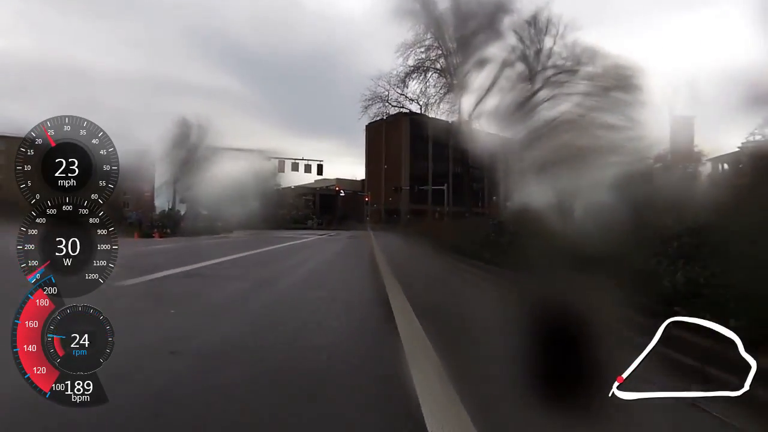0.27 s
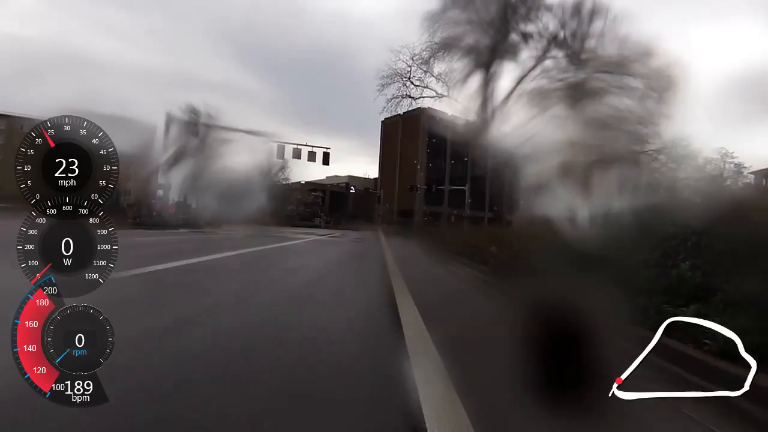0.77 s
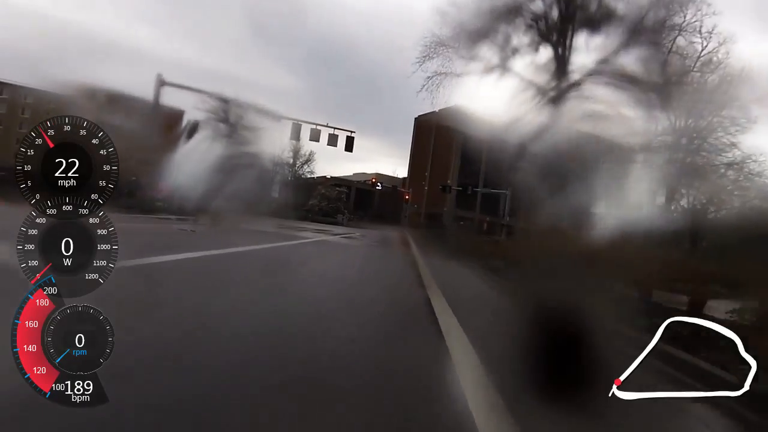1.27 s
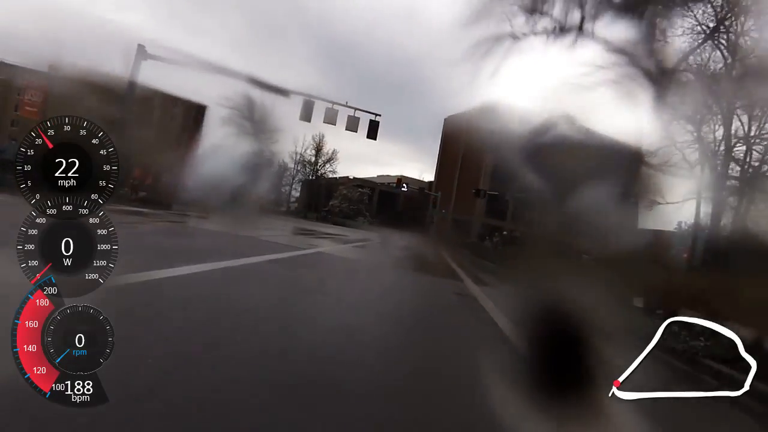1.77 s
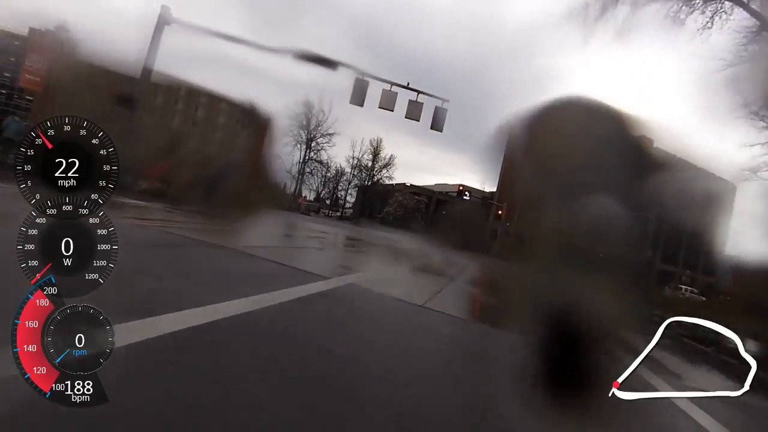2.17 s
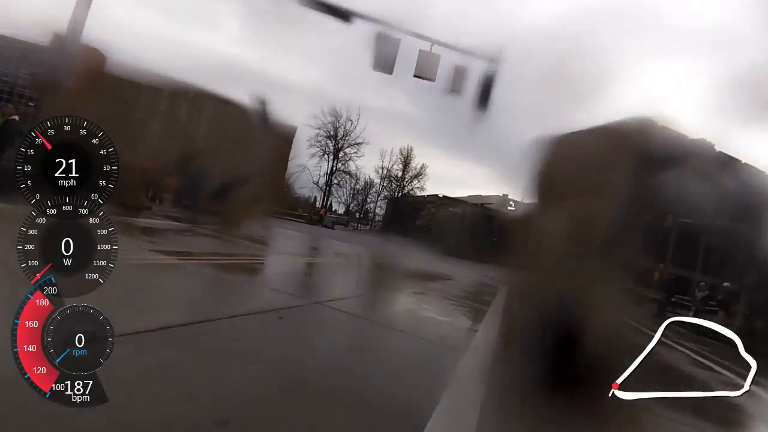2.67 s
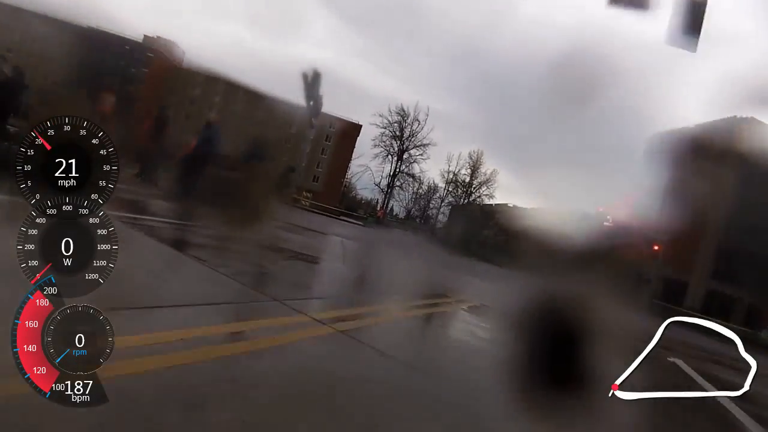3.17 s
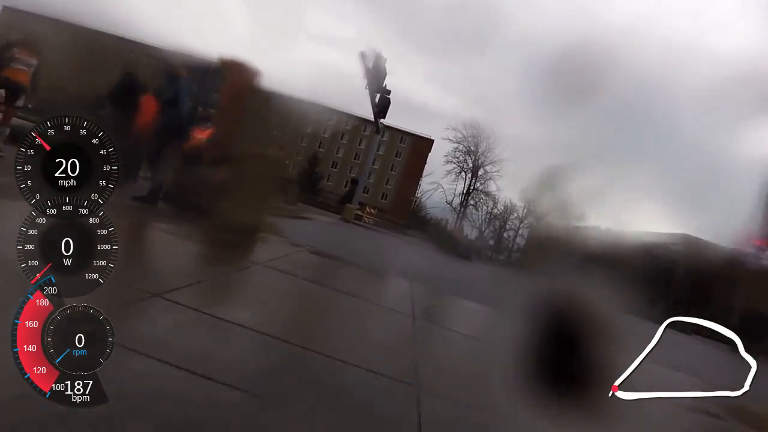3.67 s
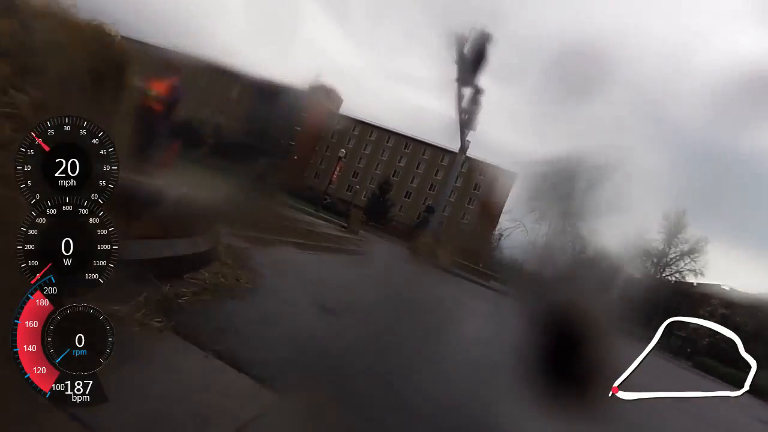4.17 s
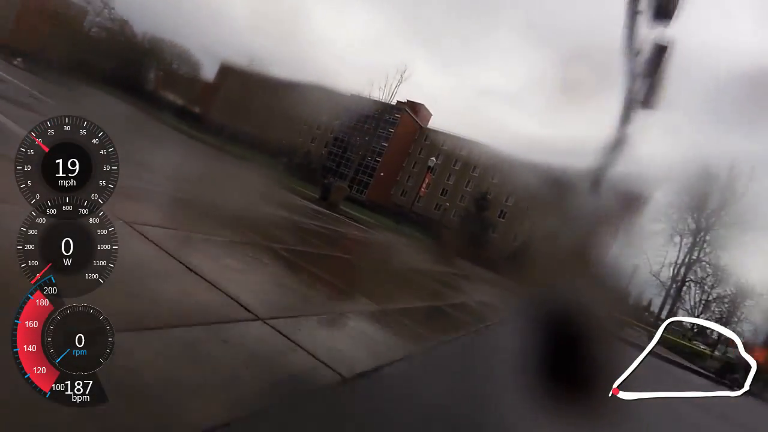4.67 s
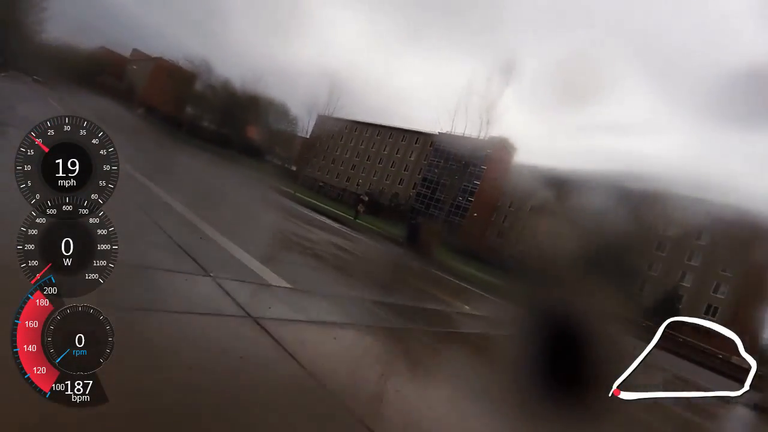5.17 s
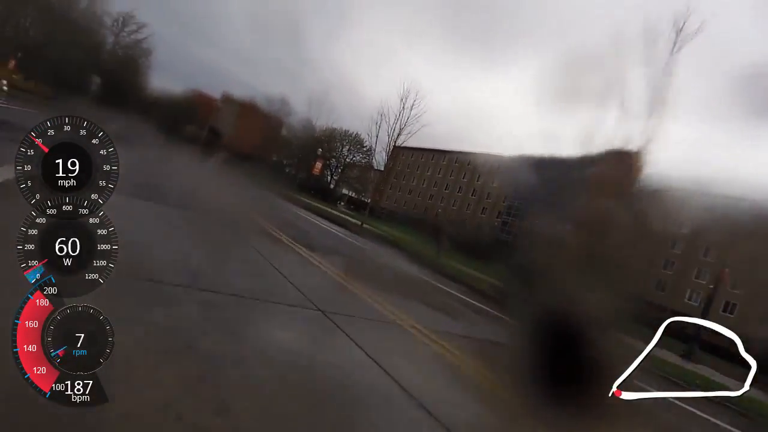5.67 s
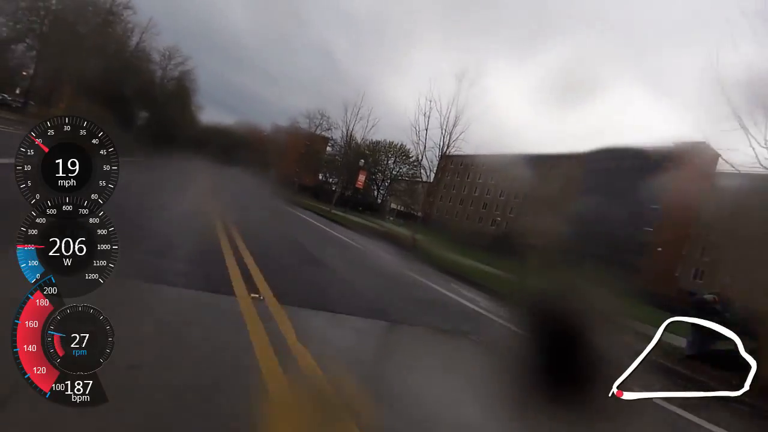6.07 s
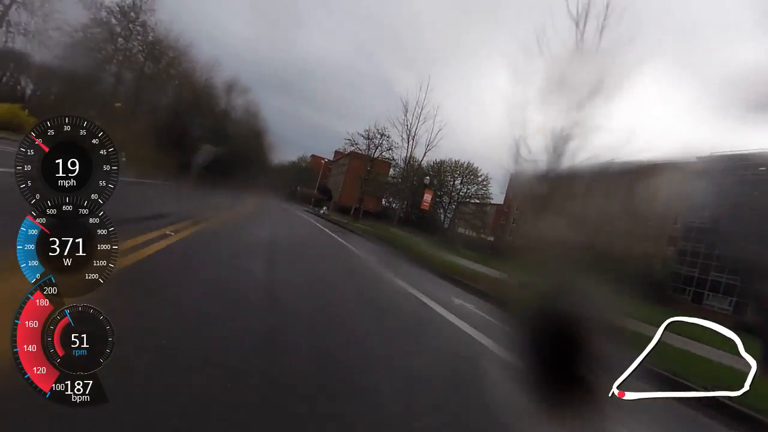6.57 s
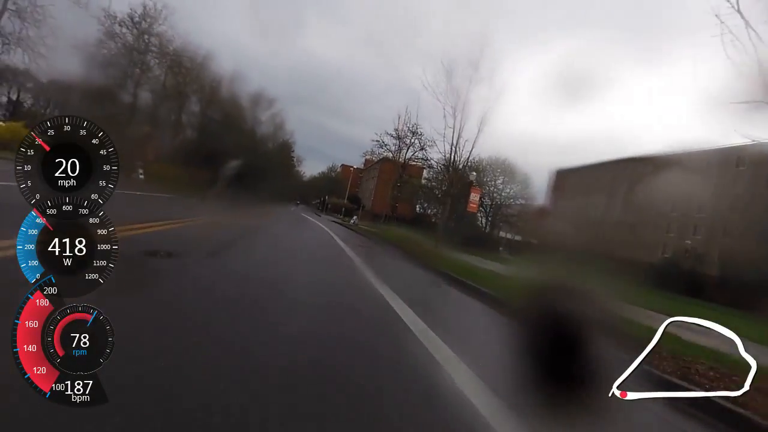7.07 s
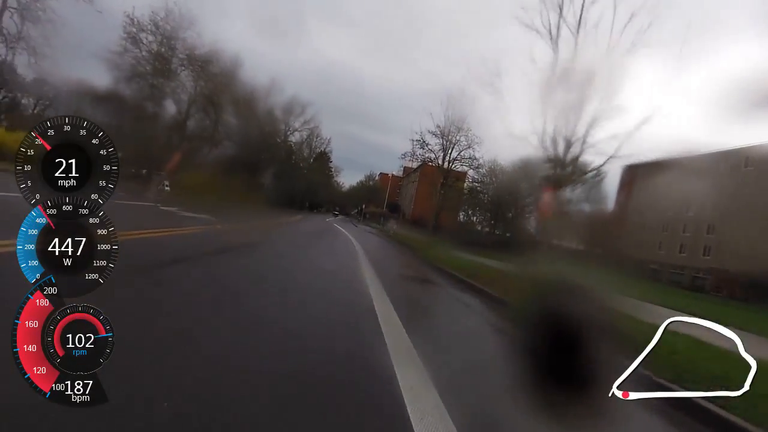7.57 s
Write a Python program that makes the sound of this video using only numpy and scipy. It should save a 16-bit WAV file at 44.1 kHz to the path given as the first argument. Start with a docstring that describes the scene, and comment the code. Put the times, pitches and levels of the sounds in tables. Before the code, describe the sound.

Close, hollow road buzz and frame rumble come through a microphone mounted on a bicycle riding outdoors in the wet. Tyre spray hisses and small parts tick. After a short, gritty rub of brakes, the paving turns rough, bringing dull bumps and then clusters of sharp plastic knocks that slightly overload the microphone. A short rising groan follows, and the ride settles into a steadier drone with a soft chain whirr.

```python
"""Racing bicycle on a wet corner

A bicycle with a camera bolted to it coasts through a wet corner, then pedals away.
Road buzz and deep frame shake drum on the camera's hollow housing, which colours the sound.
The brakes rub on the rims and the tyres throw off hissing water. Joints in the concrete
thump through the frame and make the camera mount clack, hard enough to overload the microphone."""
import sys
import numpy as np
from scipy import signal
from scipy.fft import rfft, irfft, next_fast_len
from scipy.io import wavfile
from scipy.ndimage import uniform_filter1d, map_coordinates

SR = 44100
rng = np.random.default_rng(int(sys.argv[2]) if len(sys.argv) > 2 else 0)


def unload_wav(signal):
    """Save mono or channel-first audio to the path in sys.argv[1] as 16-bit WAV at rate SR, clipped to [-1, 1]."""
    wavfile.write(
        sys.argv[1],
        SR,
        np.round(np.clip(np.atleast_2d(signal).T, -1, 1) * 32767).astype(np.int16),
    )


N = 345303
TIME = np.arange(N) / SR


# Coarse strips of paving shake the housing harder, smooth ones less.
# Each row: time in seconds, change in dB, half the crossing time in seconds.
PAVING_STRIPS = [(1.09, 1, 0.029), (1.28, -2.5, .02), (1.372, 2.5, 0.0071), (1.42, -2, 0.018),
                 (1.73, 2.5, .02), (1.84, 0.5, 0.032), (2.52, 2, .012), (2.665, -0.5, 0.024),
                 (2.86, 6, 0.0099), (2.91, -9, 0.02), (2.937, 6.5, 0.008), (2.968, -12, 0.016),
                 (2.999, 5.5, 0.0097), (3.025, -18, 0.0084), (3.225, -1, 0.017), (3.255, 4, 0.019),
                 (3.297, -8.5, 0.025), (3.355, 7, 0.011), (3.412, 4, 0.01), (3.513, 3, 0.0074),
                 (3.55, 2, .01), (3.67, 7, 0.0085), (3.698, 3.5, .008), (3.91, -3, 0.011),
                 (4.638, 9, 0.0048), (4.93, 3.5, 0.023), (5.135, -8, .015), (5.25, 3, 0.012),
                 (5.698, 10.5, .008), (5.9, 3, 0.028), (6.165, 6, 0.01), (6.26, -1.5, .03),
                 (6.66, 8, 0.014), (6.85, -3.5, 0.024), (6.95, 2.5, 0.045), (7.0, -6.5, 0.013),
                 (7.065, 2, 0.018), (7.16, -1.5, 0.029), (7.25, 3.5, .012), (7.7, 2.5, 0.039),
                 (7.75, -6.5, 0.013)]
def rolling(uneven, wet_db, patch_db):
    """The grain of the road shakes frame, housing and tread; uneven paving jogs them all together."""
    shudder = from_db((1.13 + 0.96 * uneven) * drift(18))
    buzz = road_buzz(shudder, uneven)
    drone = housing_drone(shudder)
    rumble = frame_rumble(shudder, uneven)
    roar = tread_roar(shudder, wet_db, patch_db)
    shaking = drone + wander(buzz, share=0.0221) + wander(rumble, share=0.04)
    return from_db(swells(PAVING_STRIPS)) * shaking + wander(roar, share=0.0202)


# The tone of the buzz. Each row: frequency in Hz, level in dB.
BUZZ_SPECTRUM = [(280, -8.5), (335, -0.5), (450, -3.5), (620, -6.5), (850, -18), (1300, -42), (2000, -66)]
def road_buzz(shudder, uneven):
    """Fine road grain makes the housing buzz."""
    force = shudder * rush(flutter_db=1, rate=110)
    return from_db(-20.5 - 0.7 * uneven) * steady(housed(force, BUZZ_SPECTRUM), samples=4000)


# The tone of the drone. Each row: frequency in Hz, level in dB.
DRONE_SPECTRUM = [(190, -13), (230, -4.5), (262, -2), (288, 0), (330, -6), (400, -21.5), (480, -24),
                  (535, -11.5), (600, -30.5)]
# The drone is strongest on smooth asphalt. Each row: time in seconds, level in dB.
DRONE_LEVELS = [(0, -16), (0.8, -19), (1.1, -16.5), (1.7, -17), (2.2, -20), (2.55, -15.5), (2.95, -26.5),
                (3.2, -19.5), (4.9, -21), (5.3, -29.5), (6.0, -21), (6.4, -24), (7.3, -17.5), (7.83, -21.5)]
def housing_drone(shudder):
    """The hollow housing drones; the sound swells and comes in lumps."""
    level_db = curves(DRONE_LEVELS)[0] + 1.84 * drift(4.9)
    force = shudder * rush(flutter_db=2.04, rate=9.1)
    return from_db(level_db) * steady(housed(force, DRONE_SPECTRUM), samples=4000)


# The tone of the rumble. Each row: frequency in Hz, level in dB.
RUMBLE_SPECTRUM = [(65, -9), (90, -6.5), (113, 0.5), (140, -2.5), (175, 2), (210, 0.5), (260, -16)]
def frame_rumble(shudder, uneven):
    """The shaken frame gives a low rumble that slowly swells and fades."""
    level_db = -22 - uneven + 1.4 * drift(1)
    force = shudder * rush(flutter_db=2.5, rate=9.3)
    return from_db(level_db) * steady(housed(force, RUMBLE_SPECTRUM), samples=4000)


# The tone of the roar. Each row: frequency in Hz, level in dB.
ROAR_SPECTRUM = [(450, 6), (600, -5.5), (800, -1), (1000, -4.5), (1350, -5), (1600, -11), (1950, -18),
                 (3000, -43), (4400, -53.5), (7000, -86)]
def tread_roar(shudder, wet_db, patch_db):
    """The tread roars on the road, louder where it is wetter."""
    tread = rush(flutter_db=3.5, rate=7) + from_db(-0.5) * grains(per_s=270, spread_db=0.5)
    roar = steady(housed(np.sqrt(shudder) * tread, ROAR_SPECTRUM), samples=4000)
    return from_db(-31.5 + 0.19 * wet_db + patch_db) * roar


# A wheel drops into a joint. Each row: start in seconds, level in dB, hardness in dB per octave.
JOINT_HITS = [(2.507, -3, -12), (3.142, -1, -0.5), (3.249, -3.5, -1), (3.349, -4.5, 6), (3.545, 2, -16),
              (3.661, -2, 0.5), (3.798, -8, 17), (3.945, -2.5, -10), (4.114, -5.5, 10), (4.29, 1.5, 2),
              (5, 2, -3), (5.09, 0, -4.5), (5.108, 1, -5), (5.21, 3.5, 2.5), (5.434, 0.5, 2.5),
              (5.474, 3.5, -1), (5.554, 4, 3.5), (5.6765, 0.5, 7), (5.788, -2.5, 7), (6.06, -1, 12),
              (6.537, 2, 1), (6.638, -1, 2), (6.942, -11, 11)]
# The bicycle's low tones. Each row: pitch in Hz, level in dB, ring time in seconds.
FRAME_TONES = [(55.6, -24, 0.015), (122.7, 1.5, 0.05), (277.4, -2, 0.036)]
def bumps(push_s):
    """A tyre's soft push makes the bicycle thump; a harder edge favours the higher tones."""
    out = np.zeros(N)
    middle_hz = FRAME_TONES[1][0]
    for start, db, hardness in JOINT_HITS:
        for hz, tone_db, ring_s in FRAME_TONES:
            tilt_db = hardness * np.log2(hz / middle_hz)
            add(out, start, from_db(db + tone_db + tilt_db) * ring(hz, ring_s, push_s))
    return out


# The loose mount strikes. Each row: start in seconds, knock level in dB, knock pitch in Hz,
# crack level in dB, grinding time in seconds, time for the chatter to fade in seconds.
MOUNT_HITS = [(4.3644, 3, 645, -1, 0.00078, 0.016), (4.3708, -10, 700, -20, .0004, 0.0055),
              (4.4136, -1, 640, -17, .0004, .006), (4.4532, 5, 666, -2, 0.0011, 0.038),
              (4.4931, 5, 620, -5.5, 0.00043, 0.011), (4.5418, 3.5, 630, -13, .0004, .006),
              (4.9923, 1.5, 574, -10.5, 0.0009, 0.026), (5.0146, -4, 566, -14.5, .0005, 0.0032),
              (5.0362, 2, 594, -2, 0.0012, 0.0066), (5.1564, -0.5, 560, -6, .0006, 0.0071),
              (5.279, -7, 600, -12, .002, 0.02), (5.2815, -9, 600, -9.5, 0.0015, 0.034),
              (5.2895, 0, 600, -14, 0.0011, .014), (5.4797, 2, 560, -25, 0.00044, 0.0053),
              (5.672, -4.5, 600, -10, .0005, 0.015), (5.7066, -8, 920, 5.5, 0.0026, 0.013),
              (5.7095, -3, 900, 5.5, 0.0011, 0.023), (5.7305, 2.5, 614, -2, .0006, 0.0144),
              (5.9478, -4, 605, 5.5, 0.0023, .01), (5.9511, -9, 900, -10.5, .0005, 0.012),
              (6.0605, 1, 660, -13, .0015, 0.018), (6.064, 6, 680, -9.5, .002, 0.15),
              (6.0724, 6.5, 600, -17.5, .001, 0.014), (6.0996, -15, 650, -11.5, .001, .014),
              (6.1788, -7.5, 605, -11, 0.00064, 0.012), (6.5331, -5, 596, -9.5, 0.0053, 0.019),
              (6.55, 4, 720, -2.5, 0.0004, 0.013), (6.6394, -3.5, 554, -14.5, .0006, 0.0064)]
# The tone of a crack. Each row: frequency in Hz, level in dB.
CRACK_SPECTRUM = [(400, 4.5), (950, 8), (1700, 10), (2300, 5), (3200, 5), (4100, -6.5), (5000, -18.5),
                  (6300, -26.5), (7500, -43), (16000, -38)]
# Where the plastic mount resonates. Each row: frequency in Hz, width in Hz, boost in dB.
PLASTIC_RESONANCES = [(912, 51, 15), (1640, 160, 0.5), (2270, 170, 0), (3880, 580, 9.5), (5970, 280, 3.5)]
def clacks(ring_s, contact_s, chatter_db):
    """Each hit is a dead knock and a gritty crack, which reaches the microphone through solid plastic."""
    knocks, cracks = np.zeros(N), np.zeros(N)
    for start, knock_db, hz, crack_db, grind_s, fade_s in MOUNT_HITS:
        add(knocks, start, -from_db(knock_db) * ring(hz, ring_s, contact_s))
        crack = from_db(chatter_db) * chatter(fade_s, grind_s, grit_db=0.5)
        crack[0] = -1   # the sharp first touch
        top_hz = np.clip(8500 * 2 ** (crack_db / 21.5), SR / 20, SR / 3)   # gentler blows are duller
        crack = signal.sosfilt(signal.butter(1, top_hz, fs=SR, output="sos"), crack)
        add(cracks, start + 2 * contact_s, from_db(crack_db) * unit_blow(crack))
    return knocks + housed(cracks, CRACK_SPECTRUM, resonances=PLASTIC_RESONANCES)


# Jolts to the mount. Each row: start in seconds, level in dB, pitch in Hz, ring time in seconds.
MOUNT_JOLTS = [(2.927, -28, 543, 0.05), (2.995, -17.5, 540, 0.1), (3.903, -11, 522, 0.093),
               (5.278, 3.5, 625, 0.064), (5.288, -7, 548, 0.31), (5.7085, 2, 923, 0.02),
               (5.7135, -9, 540, 0.064), (6.059, 0.5, 688, 0.046), (6.07, -8.5, 609, 0.21),
               (6.099, -6.5, 655, 0.094), (6.942, -19, 570, 0.04), (7.061, -12, 560, 0.036)]
# The mount's tones. Each row: multiple of the jolt's pitch, level in dB, share of its ring time.
MOUNT_TONES = [(0.681, 1, 0.43), (1.003, 7, 0.51), (1.299, -8.5, 0.43), (1.52, -9, 0.2), (1.84, -11, .45),
               (3.08, -23, 0.21)]
def jolts(contact_s, rough_db, waver):
    """Blows leave the mount ringing; it is loose, so the ring is rough and unsteady in pitch."""
    out = np.zeros(N)
    for start, db, hz, ring_s in MOUNT_JOLTS:
        for ratio, tone_db, share in MOUNT_TONES:
            add(out, start, -from_db(db + tone_db) * ring(hz * ratio, ring_s * share, contact_s))
    return wander(out, share=waver, rate=90, settle_per_s=150) * from_db(rough_db * drift(160))


# Blows that reach a small metal part. Each row: start in seconds, level in dB.
METAL_HITS = [(4.355, -38), (4.543, -31), (4.689, -49), (5.672, -42), (5.7078, -25), (5.9494, -7),
              (6.129, -42)]
# That part's tones. Each row: pitch in Hz, level in dB, ring time in seconds.
METAL_TONES = [(4650, -1, 0.005), (5370, -3.5, 0.0062), (5920, -5, 0.0055)]
def pings(contact_s):
    """A small metal part adds a short, bright ring to some blows."""
    out = np.zeros(N)
    for start, db in METAL_HITS:
        for hz, tone_db, ring_s in METAL_TONES:
            add(out, start, from_db(db + tone_db) * ring(hz, ring_s, contact_s))
    return out


# The course of the groan. Each row: time in seconds, pitch in Hz, level in dB.
GROAN_SLIDE = [(6.635, 235, -54), (6.655, 247, -13), (6.70, 237, -10), (6.73, 273, -10.5), (6.76, 287, -11),
               (6.80, 328.5, -20), (6.83, 350, -24), (6.87, 356, -65)]
def groan(waver, overtone_db):
    """A rough, low tone throbs and slides upward as the pedalling starts."""
    hz, db = curves(GROAN_SLIDE)
    phase = phase_of(hz * (1 + waver * drift(61)))
    tone = np.sin(phase) + from_db(overtone_db) * np.sin(2 * phase)
    throb_hz = 42 * (1 + 0.2 * drift(20))
    throb = 1 + 0.65 * np.sin(phase_of(throb_hz))
    sounding = (TIME > GROAN_SLIDE[0][0]) & (TIME < GROAN_SLIDE[-1][0])
    return sounding * from_db(db) * throb * tone


# The tone of the deep frame shake. Each row: frequency in Hz, level in dB.
SHAKE_SPECTRUM = [(30, -16.5), (42, -8.5), (75, -3), (115, -15), (200, -23), (500, -23)]
def deep_frame_shake(uneven):
    """The frame shakes with a low, fluttering rumble that grows over uneven paving."""
    shake = housed(rush(flutter_db=9, rate=4.6), SHAKE_SPECTRUM)
    return from_db(-35 + 9.5 * uneven) * steady(shake, samples=6000)


# The tones of the hiss and of the mist. Each row: frequency in Hz, level in dB.
HISS_SPECTRUM = [(1400, -6), (2000, -3), (2800, 6), (3400, -3), (4000, -5.5), (4500, -14.5), (5500, -20),
                 (6500, -32), (8000, -40), (16000, -59.5)]
MIST_SPECTRUM = [(4500, -3.5), (5600, -2), (6200, -8), (6900, -19.5)]
# Mist sizzles where the water lies deeper. Each row: time in seconds, level in dB.
MIST_LEVELS = [(0, -90.5), (2.8, -83.5), (3.12, -67), (3.27, -69), (3.5, -64.5), (3.7, -71), (3.82, -62),
               (4.05, -74.5), (4.55, -79), (4.72, -69), (4.88, -70), (5.3, -79.5), (6.1, -70.5),
               (6.7, -78.5), (7.05, -77), (7.18, -82), (7.3, -74), (7.45, -85)]
def wet_tyres(hiss_db):
    """Water tears off the tread as hiss and mist; bigger drops crackle on the housing."""
    water = rush(flutter_db=4.5, rate=7.1) + from_db(-6) * grains(per_s=1400, spread_db=0)
    hiss = steady(housed(water, HISS_SPECTRUM), samples=3000)
    drops = unit_level(housed(grains(per_s=27, spread_db=1.5), TICK_SPECTRUM, colour=0.6))
    mist = steady(housed(rush(flutter_db=3, rate=35), MIST_SPECTRUM), samples=3000)
    return from_db(hiss_db) * (hiss + from_db(-10.5) * drops) + from_db(curves(MIST_LEVELS)[0]) * mist


# Braking before the corner. Each row: time in seconds, level in dB.
BRAKE_LEVELS = [(0.705, -83), (0.725, -48), (0.75, -49), (0.81, -44), (0.86, -39), (0.9, -44), (1.0, -42.5),
                (1.12, -46), (1.3, -44.5), (1.56, -48.5), (1.68, -57), (1.76, -99)]
# The tone of the rubbing. Each row: frequency in Hz, level in dB.
BRAKE_SPECTRUM = [(1600, -4), (2200, 5.5), (3000, -0.5), (3900, -4), (4500, -8.5), (5300, -8),
                  (6100, -16.5), (7000, -36), (10000, -53)]
def brakes():
    """Pads grind water and grit along the rims, juddering as they grab and let go."""
    judder_hz = 27 * (1 + 0.13 * drift(7.2))
    level_db = curves(BRAKE_LEVELS)[0] + 1.5 * np.sin(phase_of(judder_hz))
    grit = rush(flutter_db=2, rate=60) + from_db(0.5) * grains(per_s=910, spread_db=3.5)
    return from_db(level_db) * steady(housed(grit, BRAKE_SPECTRUM), samples=1500)


# Cables, chain and thrown grit tap the frame. Each row: start in seconds, level in dB.
FRAME_TAPS = [(0.348, -29), (0.726, -18.5), (1.177, -19), (1.684, -20), (1.727, -21.5), (2.245, -22.5),
              (2.374, -24.5), (3.14, -18), (3.626, -16), (3.808, -20), (3.945, -9), (4.0535, -14),
              (4.092, -16.5), (4.16, -18), (4.355, -19), (4.4407, -9.5), (4.688, -18), (5.107, -8),
              (5.471, -16), (5.6, -14), (5.6838, -11), (5.691, -6.5), (6.128, -18), (6.161, -17),
              (6.169, -12.5), (6.248, -19), (6.303, -18), (6.332, -20), (6.374, -19), (6.401, -20),
              (6.729, -24), (6.918, -23.5), (7.045, -23.5), (7.087, -26), (7.109, -27), (7.271, -24.5),
              (7.315, -24), (7.589, -27)]
# The tone of ticks, taps and drops. Each row: frequency in Hz, level in dB.
TICK_SPECTRUM = [(600, -11.5), (1200, -3), (2500, 2), (3700, 2), (4600, -15.5), (6000, -30), (8000, -46)]
def rattle(uneven):
    """Loose cables and chain tick, louder over rough paving, with clearer taps in between."""
    ticks = unit_level(housed(grains(per_s=300, spread_db=2), TICK_SPECTRUM, colour=0.4))
    taps = np.zeros(N)
    for start, db in FRAME_TAPS:
        add(taps, start, from_db(db) * unit_blow(chatter(fade_s=0.015, grind_s=0.0039, grit_db=12.5)))
    return from_db(-60.5 + 9.5 * uneven) * ticks + housed(taps, TICK_SPECTRUM, colour=0.58)


# The chain runs while the rider pedals. Each row: time in seconds, level in dB.
CHAIN_LEVELS = [(0, -49.5), (0.55, -62), (0.85, -83), (6.7, -83), (7.0, -53), (7.83, -54)]
# The tone of its whirr. Each row: frequency in Hz, level in dB.
CHAIN_SPECTRUM = [(1500, -6), (2300, 3.5), (3000, -5), (3900, -5.5), (4500, -23.5)]
def chain():
    """Wet links run onto the teeth in a dense, soft whirr."""
    links = housed(grains(per_s=4500, spread_db=3.5), CHAIN_SPECTRUM)
    return from_db(curves(CHAIN_LEVELS)[0]) * steady(links, samples=3000)


# Where the housing resonates. Each row: frequency in Hz, width in Hz, boost or cut in dB.
HOUSING_RESONANCES = [(112.8, 19, 14), (165.6, 56, 10.5), (272.8, 42, 7.5), (417.4, 15, 3.5),
                      (438, 13, -1.5), (522, 25, 9.5), (964, 57, 11.5), (1134, 13, -8.5), (1146, 170, 10),
                      (1317, 370, 7), (1514, 65, -15), (1629, 130, 13), (2370, 440, 6), (2870, 130, 4),
                      (3840, 470, 9), (5500, 120, 3.5)]
def housed(force, spectrum, colour=1, resonances=HOUSING_RESONANCES):
    """Shape a force by a spectrum and by resonances; colour sets how strong the resonances are."""
    size = 2 * next_fast_len(N // 2 + SR // 4)
    hz = np.maximum(np.arange(size // 2 + 1) * SR / size, 1)
    points, levels = np.transpose(spectrum)
    octaves_outside = np.abs(np.log2(hz / np.clip(hz, points[0], points[-1])))
    db = np.interp(np.log(hz), np.log(points), levels) - 30 * octaves_outside
    for centre, width, peak_db in resonances:
        db = db + colour * peak_db / (1 + (2 * (hz - centre) / width) ** 2)
    cepstrum = irfft(np.log(from_db(db)))   # folded below, so nothing rings before it is struck
    cepstrum[1:size // 2] *= 2
    cepstrum[size // 2 + 1:] = 0
    return irfft(rfft(force, size) * np.exp(rfft(cepstrum)))[:N]


def ring(hz, ring_s, contact_s):
    """A struck tone builds up over the contact time and fades by 60 dB over the ring time."""
    t = TIME[:SR // 4]
    attack = 1 - np.exp(-(t / contact_s) ** 2)
    return np.sin(2 * np.pi * hz * t) * from_db(-60 * t / ring_s) * attack


def chatter(fade_s, grind_s, grit_db):
    """Two parts grind for an instant, then chatter in ever smaller, uneven touches."""
    t = TIME[:SR // 20]
    touches = np.interp(t, np.linspace(0, t[-1], 60), rng.standard_normal(60))
    grit = from_db(grit_db * touches * (t > grind_s))
    fade = from_db(-60 * np.maximum(t - grind_s, 0) / fade_s)
    return rng.standard_normal(len(t)) * grit * fade


def rush(flutter_db, rate):
    """Noise whose strength flutters."""
    return rng.standard_normal(N) * from_db(flutter_db * drift(rate))


def grains(per_s, spread_db):
    """Tiny random impacts; more spread makes a few of them stand out."""
    sizes = from_db(spread_db * np.minimum(rng.exponential(1, N), 4)) * rng.choice([-1, 1], N)
    return unit_level(sizes * (rng.random(N) < per_s / SR))


def drift(rate):
    """A smooth random wobble of typical size 1, mostly slower than the rate in Hz."""
    pole = np.exp(-80 * np.pi * rate / SR)
    noise = rng.standard_normal(N // 40 + 2002)
    slow = signal.lfilter([1], [1, -2 * pole, pole * pole], noise)[2000:]
    return np.interp(np.arange(N) / 40, np.arange(len(slow)), unit_level(slow))


def wander(x, share, rate=4, settle_per_s=5):
    """Make the pitch waver by about this share, by running the sound faster and slower."""
    offset = signal.lfilter([1], [1, -(1 - settle_per_s / SR)], share * drift(rate))
    return map_coordinates(x, [np.arange(N) + offset], order=3, mode="mirror")


def swells(rows):
    """Level change in dB as short stretches of road pass."""
    return sum(db * np.exp(-((TIME - middle) / half_s) ** 2) for middle, db, half_s in rows)


def curves(rows):
    """Join a table's points in time with straight lines, one curve per value column."""
    times, *columns = np.transpose(rows)
    return [np.interp(TIME, times, column) for column in columns]


def add(out, start, sound):
    """Mix in a short sound at a start time in seconds."""
    at = int(start * SR)
    out[at:at + len(sound)] += sound[:N - at]


def steady(x, samples):
    """Hold the level near 1 over every stretch of this many samples."""
    return x / np.sqrt(uniform_filter1d(uniform_filter1d(x ** 2, samples), samples) + 1e-12)


def unit_blow(contact):
    """Scale a contact to an energy of 1 in the band where it is heard."""
    band = signal.butter(2, [1500, 4500], "band", fs=SR, output="sos")
    return contact / np.linalg.norm(signal.sosfilt(band, contact))


def unit_level(x):
    return x / np.sqrt(np.mean(x ** 2) + 1e-20)


def phase_of(hz):
    return 2 * np.pi * np.cumsum(hz) / SR


def from_db(db):
    return 10 ** (np.asarray(db) / 20)


def gain_control(x, limit_db, sense_s, recover_db_per_s):
    """The camera turns itself down just after a loud blow and climbs back at a steady rate."""
    pole = np.exp(-1 / (sense_s * SR))
    level_db = 10 * np.log10(signal.lfilter([1 - pole], [1, -pole], x ** 2) + 1e-12)
    excess_db = np.maximum(level_db - limit_db, 0)
    climb_db = recover_db_per_s * TIME
    duck_db = np.maximum.accumulate(excess_db + climb_db, axis=-1) - climb_db
    return x * from_db(-signal.lfilter([1 - pole], [1, -pole], duck_db))


# Asphalt, jointed concrete, then asphalt again. Each row: time in seconds, unevenness (0 is smooth).
UNEVENNESS = [(0, 0.1), (0.9, 0.3), (2.65, 0.2), (2.95, 0.9), (4.0, 1.2), (4.5, 1), (4.66, 0.04), (4.88, 0),
              (5.02, 1.3), (6.3, 1), (6.6, 0.1), (7.1, 0.2), (7.83, 0.01)]
# Water thrown off the tyres. Each row: time in seconds, hiss level in dB.
SPRAY_LEVELS = [(0, -50), (0.6, -48), (1.6, -48.5), (2.0, -52), (2.35, -47), (2.74, -52.5), (2.86, -46.5),
                (3.15, -45), (3.5, -44), (4.0, -45.5), (4.8, -46), (5.3, -48.5), (6.3, -51.5),
                (6.55, -41.5), (6.7, -52.5), (7.3, -56.5), (7.45, -57), (7.83, -53.5)]
# Wetter and drier patches pass under the tyres.
# Each row: time in seconds, change of the tread roar in dB, half the crossing time in seconds.
WET_PATCHES = [(2.68, -1, 0.14), (2.848, 8, 0.016), (3.09, 6, .04), (3.15, 2.5, 0.015), (3.28, -6, 0.049),
               (3.53, 3, 0.037), (3.8, 2, 0.025), (4.26, 4.5, .025), (4.94, 3, 0.11), (7.67, 3.5, .05)]
def scene():
    """The road's unevenness and wetness drive the steady sounds; joints add the blows."""
    uneven, = curves(UNEVENNESS)
    spray_db, = curves(SPRAY_LEVELS)
    patch_db = swells(WET_PATCHES)
    tyres = rolling(uneven, spray_db - spray_db.mean(), patch_db)
    tyres += wet_tyres(spray_db + 0.86 * patch_db)
    mount = clacks(ring_s=0.011, contact_s=0.00018, chatter_db=-10)
    mount += jolts(contact_s=0.00074, rough_db=1, waver=0.063)
    mount += pings(contact_s=0.00045)
    background = rattle(uneven) + deep_frame_shake(uneven) + chain() + brakes()
    mix = tyres + bumps(push_s=0.0033) + mount + groan(waver=0.06, overtone_db=-20.5) + background
    return mix[None]


def record(dry):
    """The camera drops the deepest rumble, ducks after blows, squashes peaks and cuts the top treble."""
    low_cut = signal.butter(2, 32, "high", fs=SR, output="sos")
    high_cut = signal.cheby2(12, 70, 18000, fs=SR, output="sos")
    ducked = gain_control(signal.sosfilt(low_cut, dry), limit_db=-8.5, sense_s=0.029, recover_db_per_s=51)
    squashed = ducked / (1 + ducked ** 10) ** (1 / 10)
    return signal.sosfilt(high_cut, squashed)


dry = scene()
out = record(dry)
unload_wav(out)
```